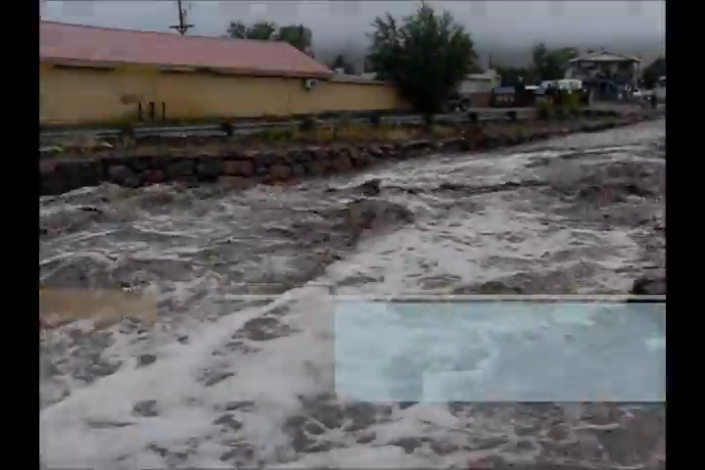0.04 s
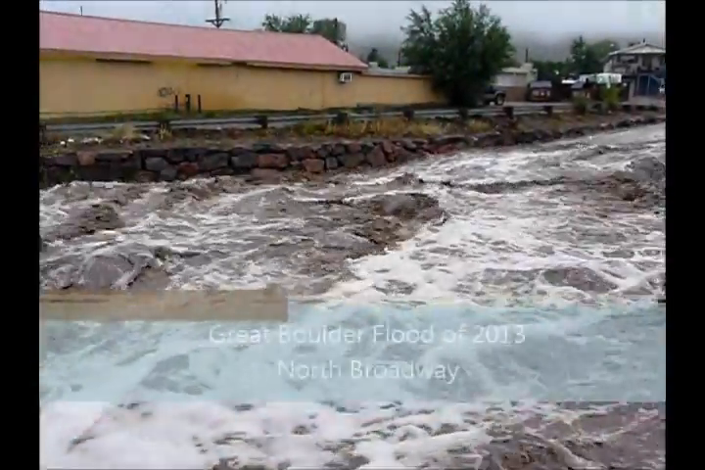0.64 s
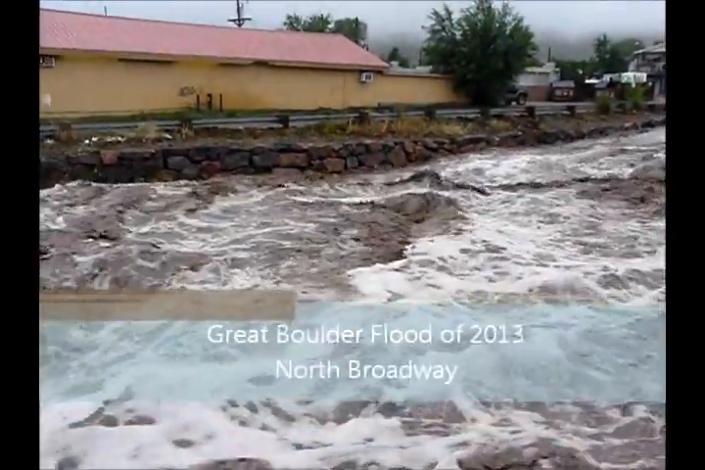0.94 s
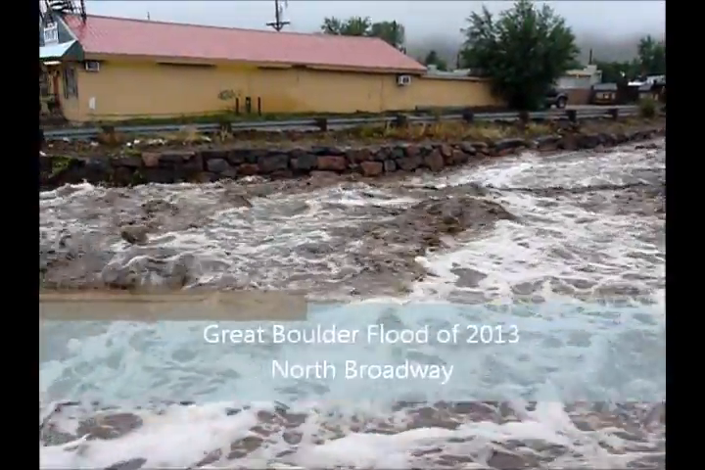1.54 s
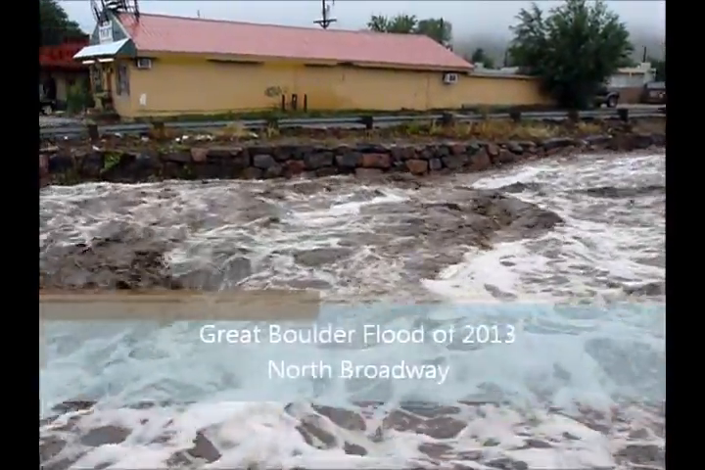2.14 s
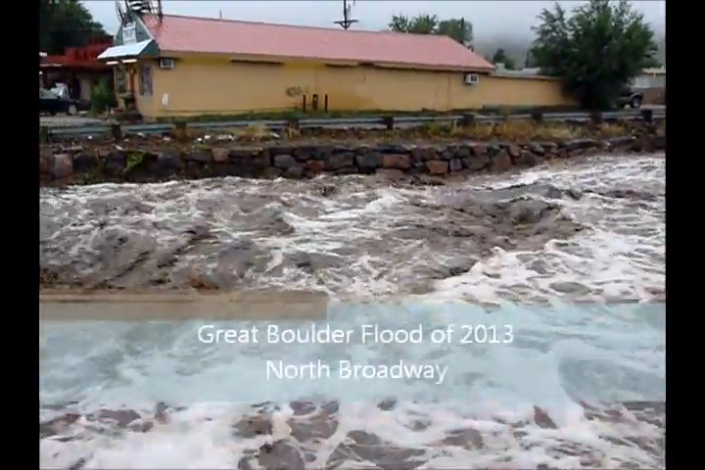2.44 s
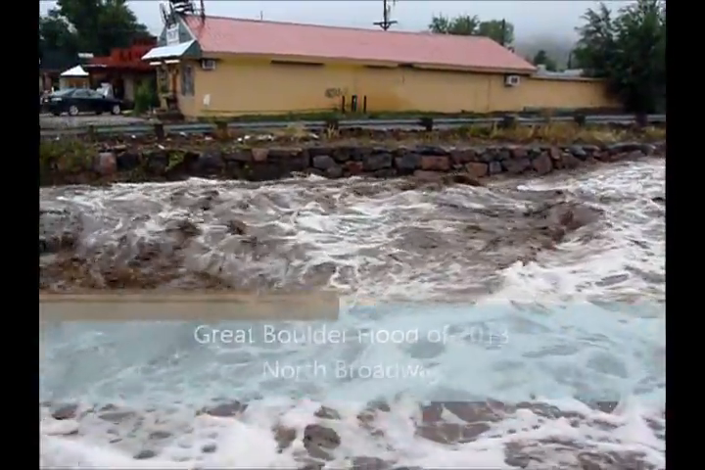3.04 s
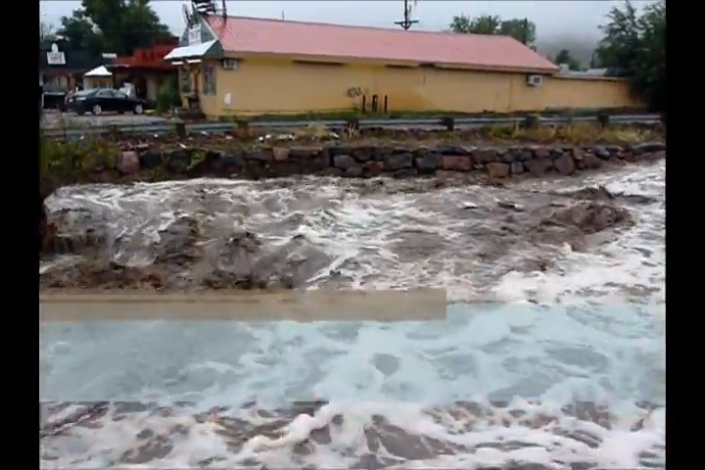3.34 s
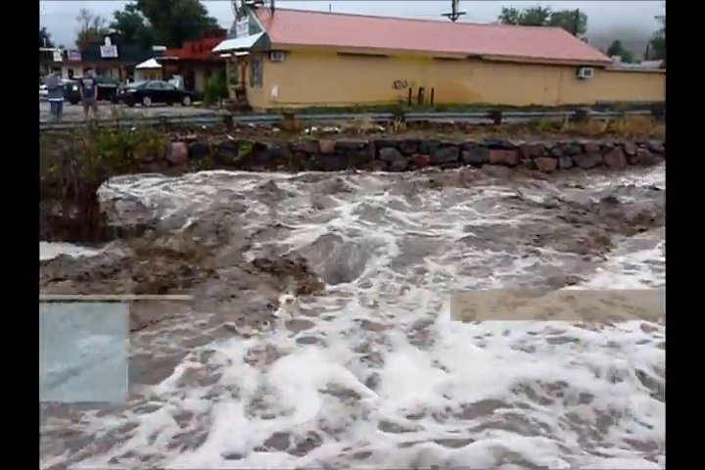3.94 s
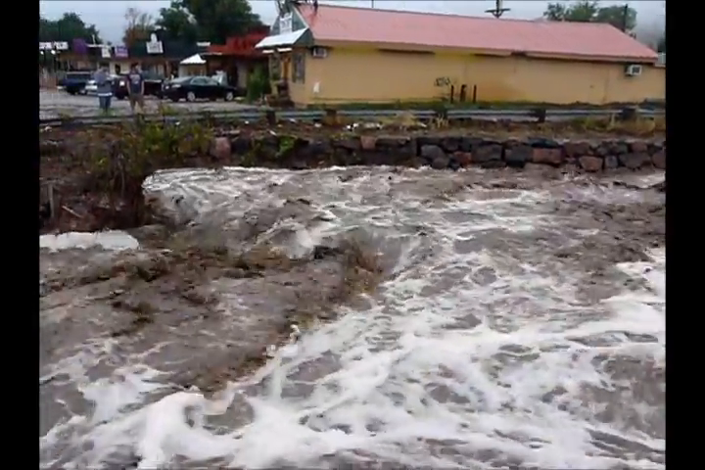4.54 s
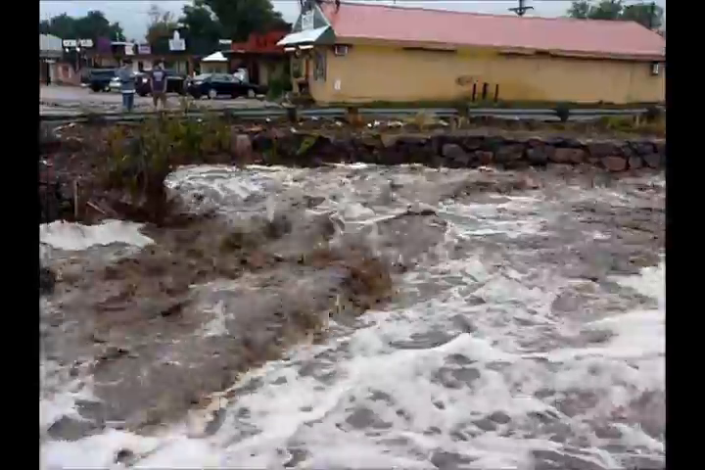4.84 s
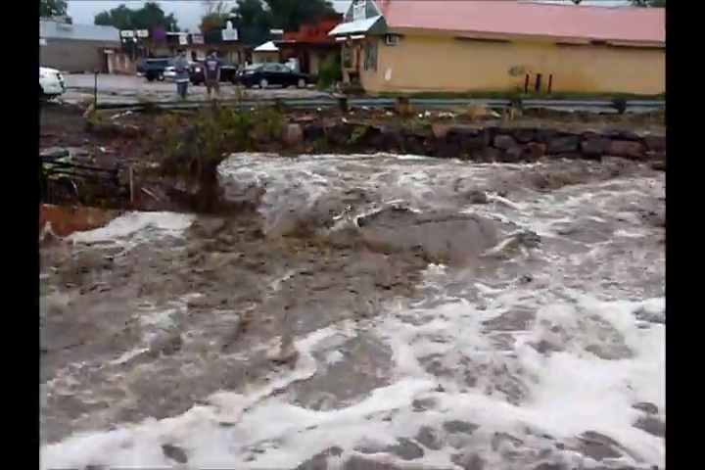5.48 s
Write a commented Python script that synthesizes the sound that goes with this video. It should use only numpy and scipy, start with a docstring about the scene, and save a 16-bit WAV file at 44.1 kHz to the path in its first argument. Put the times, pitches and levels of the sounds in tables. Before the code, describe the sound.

A swollen creek's tumbling roar and white-water hiss grow steadily louder, with a few small plops near the bank.

```python
"""A creek in flood beside a hand-held camera on the bank; the sound fades in, slightly dull at first. From the
start the current rumbles, tumbling waves roar with clouds of bubbles and white water hisses. Larger waves fold
over and swell the rush. From 3 s a few near air pockets plop and drops tick; at about 4 s the fade is complete.
Throughout, two close microphone ports hear the bass alike, and the camera cuts three narrow notches and the top
treble."""
import sys
import numpy as np
from scipy import signal
from scipy.fft import rfft, irfft
from scipy.io import wavfile
from scipy.ndimage import uniform_filter1d

SR = 44100
rng = np.random.default_rng(int(sys.argv[2]) if len(sys.argv) > 2 else 0)


def to_wav(s):
    """Save 16-bit WAV."""
    ch = np.atleast_2d(s).T  # columns
    pcm = np.round(np.clip(ch, -1, 1) * 32767)  # PCM
    wavfile.write(sys.argv[1], SR, pcm.astype(np.int16))


N = 251811
TIME_S = np.arange(N) / SR


def undb(db):
    """Decibels to gain."""
    return 10 ** (np.asarray(db) / 20)


def unit_rms(x):
    """Scale to rms 1."""
    return x / np.sqrt(np.mean(x ** 2))


def colour(x, curve):
    """Filter by (frequency [Hz], gain [dB]) points on a log-frequency axis."""
    points_hz, db = np.transpose(curve)
    hz = np.maximum(np.fft.rfftfreq(N, 1 / SR), 1)
    return irfft(rfft(x) * undb(np.interp(np.log(hz), np.log(points_hz), db)), N)


def wander(rate_hz):
    """Random steps, smoothed twice; rms 1."""
    hold = int(SR / rate_hz)
    steps = np.repeat(rng.standard_normal(N // hold + 1), hold)
    return unit_rms(uniform_filter1d(uniform_filter1d(steps, hold), hold)[:N])


def add(out, start_s, sound, side_gain):
    """Mix a sound into mid and side."""
    start = int(start_s * SR)
    sound = sound[:N - start]
    out[:, start:start + len(sound)] += np.outer([1, side_gain], sound)


def bubble(hz, cycles, glide):
    """A sine that decays 60 dB over its cycles and rises in pitch as the bubble nears the surface."""
    life = np.arange(0, 1, hz / cycles / SR)
    phase = 2 * np.pi * cycles * life * (1 + glide * life / 2)
    return np.exp(-np.log(1000) * life) * np.sin(phase)


def bubble_swarm(lo_hz, hi_hz, cycles, glide, spread_db, count):
    """Bubbles scattered over the channel, most faint, a few near; mid and side."""
    out = np.zeros((2, N))
    for when, pitch, distance, place, life in rng.random((count, 5)):
        hz = lo_hz * (hi_hz / lo_hz) ** pitch
        gain = undb(-spread_db * np.log(.02 + distance)) * hz  # small ones are brief, so start stronger
        ring = bubble(hz, cycles * (.5 + life), glide)
        add(out, when * N / SR, gain * ring, side_gain=np.sqrt(2) * np.cos(np.pi * place))
    return unit_rms(out)


def turbulence(lo_hz, hi_hz, surge_db, flicker_db, edge_count):
    """Flat mid and side noise whose bands surge with their neighbours and flicker alone."""
    edges_hz = np.geomspace(lo_hz, hi_hz, edge_count)
    band = np.digitize(np.fft.rfftfreq(N, 1 / SR), edges_hz[1:-1])
    spectrum = rfft(rng.standard_normal((2, N)))
    surges = [wander(rate_hz=7) for _ in range(edge_count)]
    out = 0
    for k in range(edge_count - 1):
        level_db = surge_db * (surges[k] + surges[k + 1]) + flicker_db * wander(rate_hz=30)
        out = out + irfft(spectrum * (band == k), N) * undb(level_db)
    return unit_rms(out)


# White-water spectrum: (frequency [Hz], relative density [dB])
HISS_SPECTRUM = [(1500, -24.5), (2250, 1.5), (2900, 1.5), (3600, 4), (5000, 0), (6100, 0.5), (7250, -2.5),
                 (7800, -9)]


def white_water(gain_db=-34.5, rise_db_per_s=0.06):
    """White water hisses evenly, with small bubbles fizzing through it."""
    hiss = turbulence(1800, 8000, surge_db=-0.18, flicker_db=0.42, edge_count=5)
    fizz = bubble_swarm(2010, 7500, cycles=20, glide=.1, spread_db=3.5, count=6000)
    foam = colour(hiss + undb(-15) * fizz, HISS_SPECTRUM)
    rise = undb(rise_db_per_s * TIME_S)  # the camera turns along the white water
    return unit_rms(foam * rise) * undb(gain_db)


# Near air pockets and drops: (time [s], pitch [Hz], relative peak [dB], ring [cycles], side gain [ratio])
NEAR_BUBBLES = [(3.0122, 3350, -26.5, 15, .7), (3.2251, 540, -9.5, 3.2, 0), (4.3405, 350, -16.5, 8, .5),
                (4.388, 445, -15, 5.5, .5), (5.5177, 3550, -20.5, 24, .25)]


def plops(attack_share=0.2):
    """By the bank, air pockets collapse with a plop and drops tick; each ring builds up briefly."""
    out = np.zeros((2, N))
    for start_s, hz, peak_db, cycles, side_gain in NEAR_BUBBLES:
        ring = bubble(hz, cycles, glide=.1)
        ring *= np.minimum(np.linspace(0, 1, len(ring)) / attack_share, 1)
        add(out, start_s, undb(peak_db) * ring / np.abs(ring).max(), side_gain)
    return out


# Tumbling-wave spectrum: (frequency [Hz], relative density [dB])
ROAR_SPECTRUM = [(19, -51), (32, -21.5), (129, -2.5), (237, -2.5), (294, 0.16), (468, -1.8), (550, -4.5),
                 (658, -3.5), (772, -6), (957, -7), (1960, -16.5), (2300, -20.5), (2990, -51.5),
                 (5060, -120)]


def churn(rumble_gain_db=-35.5, roar_gain_db=-22):
    """Waves fold over and trap air: a roar with big glugging bubbles, over the main current's rumble."""
    roar = turbulence(60, 2400, surge_db=-0.33, flicker_db=0.1, edge_count=10)
    glugs = bubble_swarm(129.7, 2190, cycles=15.8, glide=0.24, spread_db=1.5, count=5000)
    water = colour(roar + undb(-17) * glugs, ROAR_SPECTRUM)
    rumble = colour(water, [(140, 0), (200, -30)])
    return unit_rms(rumble) * undb(rumble_gain_db) + unit_rms(water - rumble) * undb(roar_gain_db)


# Larger waves: (crest time [s], length [s], lift [dB], band centre [Hz])
LARGE_WAVES = [(0.38, .35, 2.0, 430), (0.85, .2, 2.2, 4300), (1.65, 0.47, 2.4, 350), (2.24, .35, 1.5, 380),
               (2.26, .3, 4, 60), (3.03, .35, 3, 125), (3.6, .4, 1.7, 680), (4.38, .25, 5, 60),
               (4.55, .5, 1.2, 640), (5.08, 0.17, 2, 1300), (5.0, .8, 1.3, 6200), (5.35, .5, 2, 359)]


def wave_swells(water, width_octaves=1):
    """Each larger wave lifts a band as it folds: low for a heavy one, high for bursting foam."""
    edge_ratio = 2 ** (width_octaves / 2)
    out = water
    for crest_s, length_s, lift_db, hz in LARGE_WAVES:
        bandpass = signal.butter(1, [hz / edge_ratio, hz * edge_ratio], "bandpass", fs=SR, output="sos")
        swell = np.exp(-(2 * (TIME_S - crest_s) / length_s) ** 2)
        out = out + signal.sosfilt(bandpass, water) * (undb(lift_db * swell) - 1)
    return out


def brighten(water, corner_hz=700, start_db=-1.3, decay_s=.6):
    """The treble starts slightly dull and soon clears."""
    treble = signal.sosfilt(signal.butter(1, corner_hz, "highpass", fs=SR, output="sos"), water)
    return water + treble * (undb(start_db * np.exp(-TIME_S / decay_s)) - 1)


# Difference between the ports: (frequency [Hz], side gain [dB])
PORT_WIDTH = [(60, -26), (100, -43), (180, -48.5), (300, -37.5), (520, -23), (900, -18), (1540, -6.5),
              (2400, -2), (2950, 1.8), (3500, -0.3), (4200, -2.3), (7780, 0.5)]
# Left-port lag, mid fed to side a quarter cycle late: (frequency [Hz], gain [dB])
PORT_LAG = [(200, -46), (900, -30), (2600, -30), (3100, -7), (3800, -9), (5000, -30)]
# Leftward lean of the treble: (frequency [Hz], left minus right [dB])
PORT_BALANCE = [(520, 0), (1500, 1.2), (3200, 1.8), (6500, 2.1)]


def microphone_ports(water):
    """Long waves reach both close ports alike; short ones are louder left but earlier right."""
    mid, side = water
    side = colour(side, PORT_WIDTH) + colour(signal.hilbert(mid).imag, PORT_LAG)
    left = colour(mid + side, [(hz, db / 2) for hz, db in PORT_BALANCE])
    right = colour(mid - side, [(hz, -db / 2) for hz, db in PORT_BALANCE])
    return np.array([left, right])


def fade_in(start_db=-16.5, length_s=4.06):
    """Linear amplitude ramp to unity, then a hold."""
    return np.interp(TIME_S, [0, length_s], [undb(start_db), 1])


def scene():
    """Swelling roar and hiss plus near plops, all under one fade-in; left and right."""
    rush = brighten(wave_swells(churn() + white_water()))
    return microphone_ports(rush + plops()) * fade_in()


# Camera notch filters: (centre [Hz], width [Hz])
CAMERA_NOTCHES = [(2605, 520), (4603, 700), (5432, 320)]


def record(dry, cutoff_hz=7620):
    """The camera notches three narrow bands and cuts the top treble."""
    for hz, width_hz in CAMERA_NOTCHES:
        dry = signal.lfilter(*signal.iirnotch(hz, hz / width_hz, fs=SR), dry)
    return signal.sosfilt(signal.ellip(10, .2, 80, cutoff_hz, fs=SR, output="sos"), dry)


dry = scene()
out = record(dry)
to_wav(out)
```